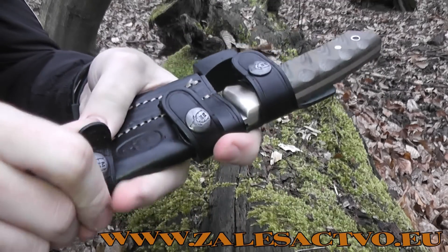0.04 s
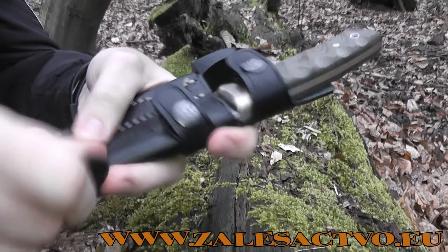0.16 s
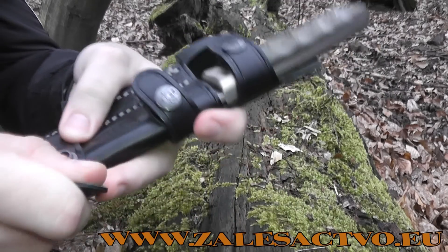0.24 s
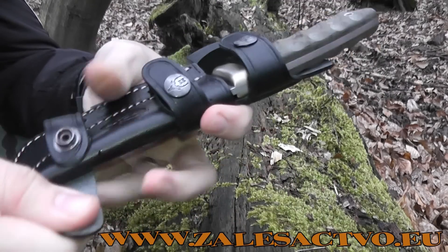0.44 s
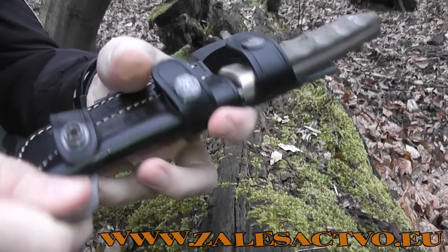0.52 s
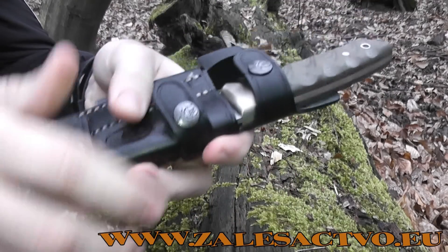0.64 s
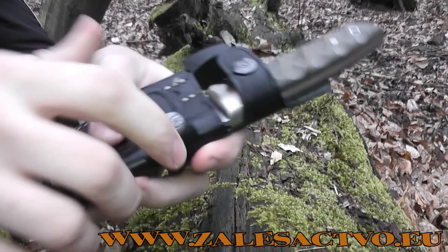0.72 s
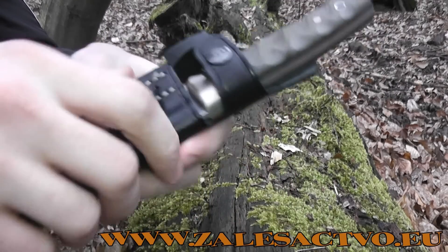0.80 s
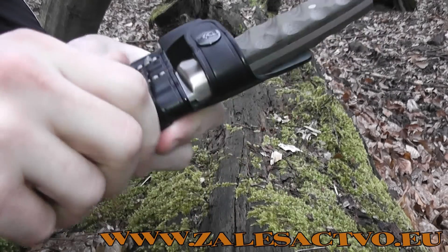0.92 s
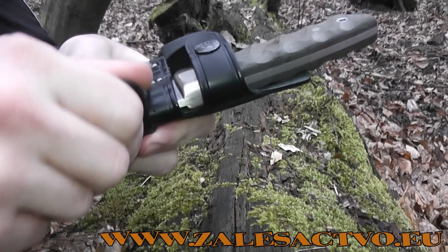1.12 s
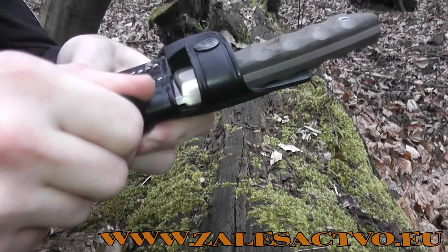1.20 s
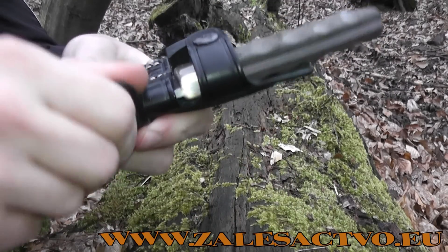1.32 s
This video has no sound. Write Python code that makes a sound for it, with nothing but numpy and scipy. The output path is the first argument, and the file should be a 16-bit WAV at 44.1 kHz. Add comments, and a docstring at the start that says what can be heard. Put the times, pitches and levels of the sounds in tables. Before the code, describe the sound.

A press stud on a leather knife sheath snaps open, followed by light ticks and rubbing.

```python
"""Press stud on a leather knife sheath

A quiet wood, the microphone close to the sheath, no echo. The stud is pulled open: its spring
scratches over the post and rings it, and the freed leather thumps. The strap is shifted by hand:
its fittings tick, it scrapes over the sheath, and fingers knock and rub over a faint outdoor hiss."""
import sys
import numpy as np
from scipy import signal
from scipy.fft import rfft, irfft
from scipy.io import wavfile
from scipy.ndimage import uniform_filter1d

SR = 44100
rng = np.random.default_rng(int(sys.argv[2]) if len(sys.argv) > 2 else 0)


def unload_wav(signal):
    """Save mono or channel-first audio to the path in sys.argv[1] as 16-bit WAV at rate SR, clipped to [-1, 1]."""
    wavfile.write(
        sys.argv[1],
        SR,
        np.round(np.clip(np.atleast_2d(signal).T, -1, 1) * 32767).astype(np.int16),
    )


N = 59535
TIME = np.arange(N) / SR
BURST_SAMPLES, LEAD_S = 2048, .004  # a noise burst opens with a silent lead
BURST_TIME = np.maximum(np.arange(BURST_SAMPLES) / SR - LEAD_S, 0)
BURST_HZ, SCENE_HZ = np.fft.rfftfreq(BURST_SAMPLES, 1 / SR), np.fft.rfftfreq(N, 1 / SR)

# spectrum of rubbed leather (frequency [Hz], relative level [dB])
RUB_SPECTRUM = [(100, -6.5), (600, 0.5), (1500, -4.5), (3000, -2.5), (4200, 0), (6300, 4), (9500, -5.5),
                (12000, -14.5), (16000, -20)]


def amp(db):
    return 10 ** (np.asarray(db) / 20)


def unit_rms(x):
    return x / np.sqrt(np.mean(x ** 2) + 1e-20)


def curve_at(points, hz):
    """Reads a curve along a logarithmic frequency axis."""
    point_hz, value = np.transpose(points)
    return np.interp(np.log(hz + 1), np.log(point_hz + 1), value)


def hump(hz, centre_hz, octaves):
    """A bell-shaped gain around one frequency."""
    return np.exp(-.5 * (np.log2((hz + 1) / centre_hz) / octaves) ** 2)


def colour(x, spectrum):
    return irfft(rfft(x) * amp(curve_at(spectrum, SCENE_HZ)), N)


def pan(left_over_right_db):
    return amp([[left_over_right_db / 2], [-left_over_right_db / 2]])


def add(mix, start_s, sound):
    part = mix[:, max(round(start_s * SR), 0):][:, :sound.shape[-1]]
    part += sound[..., :part.shape[1]]


def microphone_ports(pair, apart_db=-12):
    """One sound shared by both ports, plus a little that differs."""
    shared, apart = pair
    return shared + amp(apart_db) * apart * np.array([[1], [-1]])


def strike(rise_s, decay_s):
    """The envelope of a burst: a quick rise and an exponential fall."""
    return (1 - np.exp(-BURST_TIME / rise_s)) * np.exp(-BURST_TIME / decay_s)


def burst(envelope, gain):
    """A short noise burst, its spectrum evened out and then shaped by the gain."""
    spectrum = rfft(rng.standard_normal((2, len(envelope))) * envelope)
    spectrum /= np.sqrt(uniform_filter1d(abs(spectrum) ** 2, size=24) + 1e-12)
    noise = unit_rms(irfft(spectrum * gain))
    return microphone_ports(noise * np.sqrt(np.mean(envelope ** 2)))


def mode(hz, db, t60, rise_s):
    """One dying vibration with a soft start."""
    t = np.arange(4096) / SR
    return amp(db - 60 * t / t60) * np.sin(2 * np.pi * hz * t) * (1 - np.exp(-t / rise_s))


def slips(spectrum, per_s, spread_db):
    """A stream of tiny slips of uneven strength, coloured by the material."""
    strength = amp(spread_db * np.minimum(rng.exponential(1, N), 4))
    slipping = rng.random(N) < per_s / SR
    impulses = strength * slipping * rng.choice([-1., 1.], (2, N))
    return microphone_ports(unit_rms(colour(impulses, spectrum)))


def stroke_envelope(strokes, edge_share=.16):
    """Each stroke swells, holds and fades."""
    envelope = np.zeros(N)
    for start_s, length_s, db in strokes:
        inside_s = np.minimum(TIME - start_s, start_s + length_s - TIME)
        envelope += amp(db) * np.clip(inside_s / (edge_share * length_s), 0, 1)
    return envelope


def wood_ambience(hiss_db=-56, hum_hz=94.8, hum_db=-72):
    """The bed of the quiet wood: a wide outdoor hiss and a low hum."""
    # spectrum of the hiss (frequency [Hz], relative level [dB])
    hiss_spectrum = [(18, -41), (30, 9.5), (280, 2), (461, 1), (569, 0), (684, -2.5), (913, -4), (1070, -1),
                     (1430, -4.5), (1590, -8), (1910, -3.5), (2170, -9), (3580, -11.5), (3980, -8.5),
                     (5590, -11.5), (8520, -15), (16000, -34)]
    # likeness of the hiss in left and right (frequency [Hz], correlation [-1 to 1])
    likeness = [(60, -0.014), (180, -0.49), (550, 0.049), (1650, 0.42), (4970, 0.89), (15000, -0.71)]
    left, independent = rfft(rng.standard_normal((2, N)))
    correlation = curve_at(likeness, SCENE_HZ)
    right = correlation * left + np.sqrt(1 - correlation ** 2) * independent
    hiss = unit_rms(colour(irfft(np.array([left, right]), N), hiss_spectrum))
    hum = np.sqrt(2) * np.sin(2 * np.pi * hum_hz * TIME)
    return amp(hiss_db) * hiss + amp(hum_db) * hum


def leather_crackle():
    """Handled leather crackles faintly throughout, in sparse slips."""
    return amp(-62) * slips(RUB_SPECTRUM, per_s=900, spread_db=3)


def sheath_bumps():
    """Fingers and the flexing strap knock on the sheath, soft and hollow."""
    # dull knocks (time [s], level [dB], centre frequency [Hz])
    bumps = [(.009, -39, 660), (.033, -47.5, 740), (.339, -47.5, 555), (.4385, -42.5, 480),
             (0.45, -44.5, 2020), (.5125, -42.5, 520), (.5135, -43, 900), (.6115, -40, 666),
             (.6195, -37.5, 660), (.6405, -37.5, 925), (.650, -45, 1160), (.861, -43.5, 614),
             (.881, -44.5, 640), (1.055, -44, 1700), (1.0565, -41, 730), (1.162, -49, 600),
             (1.297, -44.5, 790), (1.298, -45.5, 1980)]
    envelope = strike(rise_s=.00056, decay_s=.0027)
    out = np.zeros((2, N))
    for start_s, db, centre_hz in bumps:
        hollow = hump(BURST_HZ, centre_hz, octaves=.33)
        add(out, start_s - LEAD_S, amp(db) * burst(envelope, hollow))
    return out


def spring_and_strap_scrapes():
    """The stud's spring scratches briefly during the snap; then the strap slides over the sheath."""
    # scrapes, first the spring's, then the strap's (time [s], length [s], level [dB])
    scrapes = [(.2222, 0.0053, -24.5), (.231, 0.014, -46), (.261, 0.015, -51), (.622, 0.0286, -43.5),
               (.648, 0.0084, -37), (.698, 0.008, -48.5), (.708, 0.0075, -51.5), (.733, 0.016, -57)]
    # spectrum of the scraping (frequency [Hz], relative level [dB])
    scrape_spectrum = [(100, -7), (450, -19), (900, -10), (2000, -17), (3300, -8.5), (4050, -3), (4350, -7),
                       (4650, -3), (5100, -6.5), (6100, 4), (7400, -6.5), (9500, 1), (12000, -10),
                       (16000, -11.5)]
    return pan(2) * stroke_envelope(scrapes) * slips(scrape_spectrum, per_s=12000, spread_db=5.5)


def stud_snap():
    """The spring jumps over the post in a quick run of contacts, and each one rings the stud."""
    # contacts of the spring (time [s], relative level [dB])
    contacts = [(.2227, -20), (.22324, -21), (.22384, -6), (.22427, 2), (.22535, -6), (.22632, -8),
                (.22813, -14)]
    # modes of the stud (frequency [Hz], relative level [dB], t60 [s], left over right [dB])
    stud_modes = [(3300, -33, 0.001, 3), (3925, -17.5, 0.0041, 3), (4730, -11, 0.0035, 6),
                  (5740, -14, 0.0053, 1), (6480, -2.5, 0.0032, 1.5), (7590, -2.5, .0026, 6),
                  (8920, -15.5, 0.0034, 10), (9530, -14.5, 0.0025, 16), (12500, -11.5, 0.0032, -5),
                  (13300, -21, 0.0027, -5)]
    ring = sum(pan(pan_db) * mode(hz, db, t60, rise_s=.00007) for hz, db, t60, pan_db in stud_modes)
    delays = sum(amp(db) * np.exp(-2j * np.pi * SCENE_HZ * start_s) for start_s, db in contacts)
    return irfft(rfft(ring, N) * delays, N)


def leather_thump(start_s=.2252):
    """The freed leather thumps just after the snap, in low modes that die quickly."""
    # modes of the leather (frequency [Hz], level [dB], t60 [s], left over right [dB])
    leather_modes = [(165.6, -20.5, 0.014, 16), (335, -19.5, 0.011, 14), (546, -3, 0.009, -1.5),
                     (1086, 1, 0.0067, 2), (1464, -7, 0.0052, 12), (2090, -12, 0.0045, -1)]
    out = np.zeros((2, N))
    for hz, db, t60, pan_db in leather_modes:
        add(out, start_s, pan(pan_db) * mode(hz, db, t60, rise_s=.0011))
    return out


def finger_rubs():
    """Fingers rub the leather in soft strokes of fine, even slips, a little to the left."""
    # strokes of the fingers (time [s], length [s], level [dB])
    strokes = [(.235, 0.067, -61), (.652, 0.024, -59.5), (.835, .07, -59.5), (.97, 0.062, -54),
               (1.008, 0.036, -54.5), (1.07, 0.14, -58.5), (1.198, 0.038, -54)]
    return pan(1.7) * stroke_envelope(strokes) * slips(RUB_SPECTRUM, per_s=7000, spread_db=2)


def fitting_ticks(rise_s=.00008, top_limit_hz=9800, top_slope=9.3, skirt_db=-16.5):
    """Each tick of the strap's fittings is a bright crack, a brief ring and a dull knock of the sheath."""
    # ticks (time [s], crack level [dB], bright centre [Hz], knock level [dB], left over right [dB])
    ticks = [(0.2397, -34, 7000, -57, 0), (0.2492, -32.5, 7960, -64, 0), (0.261, -40.5, 8950, -55, 3),
             (0.2649, -29, 9100, -52, 2.5), (0.2684, -34.5, 5950, -49, -1), (0.2742, -43, 8060, -72, 2),
             (0.2831, -40.5, 7900, -40.5, -1), (0.2843, -33.5, 8300, -43, 7),
             (0.3029, -43.5, 5550, -47, 1.5), (.3155, -49, 6000, -52, 0), (.3545, -48, 4700, -70, 0),
             (.3665, -57, 2960, -45, -2), (0.4335, -34.5, 4860, -40, 4), (0.4495, -26.5, 5100, -43, 1.5),
             (0.476, -49, 9000, -77.5, 8), (.5057, -44, 8700, -48.5, -2), (.5087, -46, 6050, -42.5, .5),
             (.5895, -47, 3000, -55, .5), (0.6096, -33, 10900, -44.5, 6), (.6178, -35.5, 8100, -46, -2),
             (0.6283, -26.5, 8900, -41, 3), (0.632, -33, 7000, -44.5, -2), (0.639, -27, 8700, -45, 4),
             (0.6982, -38, 8600, -68, 6.5), (0.7376, -40.5, 4750, -46.5, 4), (0.7483, -40, 8700, -45, -1),
             (0.7657, -49, 5430, -48, 9), (0.775, -44.5, 4940, -45.5, 10.5), (.8812, -41, 8750, -49.5, 1),
             (.8870, -50, 9050, -54, 9), (.9250, -38.5, 6500, -43.5, 3), (0.9659, -44.5, 4970, -46, -5),
             (.9770, -41, 7200, -56, .5), (1.0544, -36.5, 5600, -41.5, 1.5), (1.0759, -38.5, 7300, -49, 2),
             (1.089, -41, 4900, -45.5, -2), (1.2070, -50, 6150, -46.5, -5), (1.2622, -38, 6500, -48, 0),
             (1.284, -48, 3000, -62, .5), (1.3168, -39, 4750, -62, -1)]
    # spectrum of the sheath's knock (frequency [Hz], relative level [dB])
    knock_spectrum = [(60, -26), (250, -9), (450, -4), (630, -2), (1000, -2), (1500, -2.5), (2500, -8),
                      (6000, -36)]
    # modes of the metal fittings (frequency [Hz], greatest level against the crack [dB], t60 [s])
    fitting_modes = [(4446, -5, 0.013), (6180, -5, 0.013), (7780, -10, 0.0082), (9780, -7, 0.0076)]
    crack_envelope = strike(rise_s, decay_s=.00087) + amp(-25) * strike(rise_s, decay_s=.0034)
    knock_envelope = strike(rise_s=.00055, decay_s=.0024)
    dull = amp(curve_at(knock_spectrum, BURST_HZ))
    out = np.zeros((2, N))
    for start_s, crack_db, bright_hz, knock_db, pan_db in ticks:
        top_hz = min(2 * bright_hz, top_limit_hz)
        bright = hump(BURST_HZ, bright_hz, octaves=.57) + amp(skirt_db)
        bright /= np.sqrt(1 + (BURST_HZ / top_hz) ** top_slope)
        crack = amp(crack_db) * burst(crack_envelope, bright)
        knock = amp(knock_db) * burst(knock_envelope, dull)
        add(out, start_s - LEAD_S, pan(pan_db) * (crack + knock))
        # modes near the tick's bright centre ring most
        ring = sum(hump(hz, bright_hz, octaves=.48) * mode(hz, crack_db + ring_db, t60, rise_s)
                   for hz, ring_db, t60 in fitting_modes)
        add(out, start_s, pan(pan_db) * ring)
    return out


def scene():
    """The sheath is handled close to the microphone, in open air with no echo."""
    bed = wood_ambience() + leather_crackle()
    handling = sheath_bumps() + spring_and_strap_scrapes() + finger_rubs() + fitting_ticks()
    return bed + handling + stud_snap() + leather_thump()


def record(dry, low_cut_hz=95.4, ceiling=.8, band_limit_hz=16300):
    """The microphone chain: a low cut, a soft overload that rounds the snap's peak, a band limit."""
    low_cut = signal.butter(2, low_cut_hz, "highpass", fs=SR, output="sos")
    rounded = ceiling * np.tanh(signal.sosfilt(low_cut, dry) / ceiling)
    band_limit = signal.firwin(255, band_limit_hz, window=("kaiser", 9), fs=SR)
    return signal.oaconvolve(rounded, band_limit[None], "same")


dry = scene()
out = record(dry)
unload_wav(out)
```